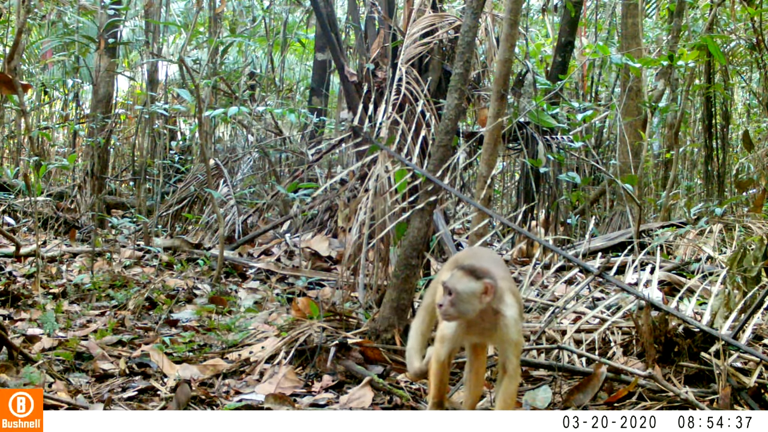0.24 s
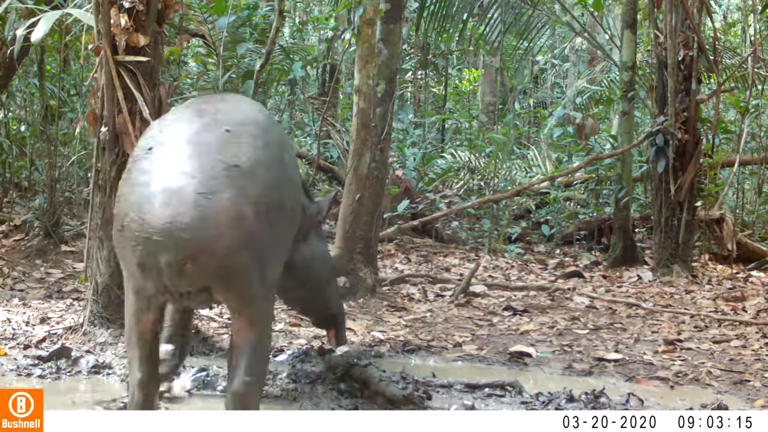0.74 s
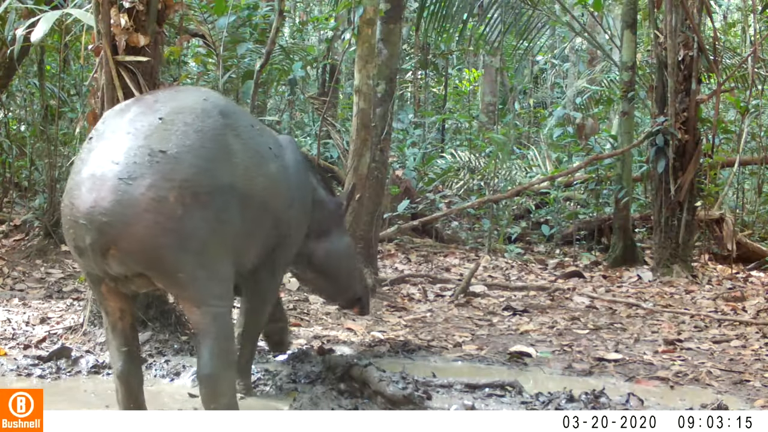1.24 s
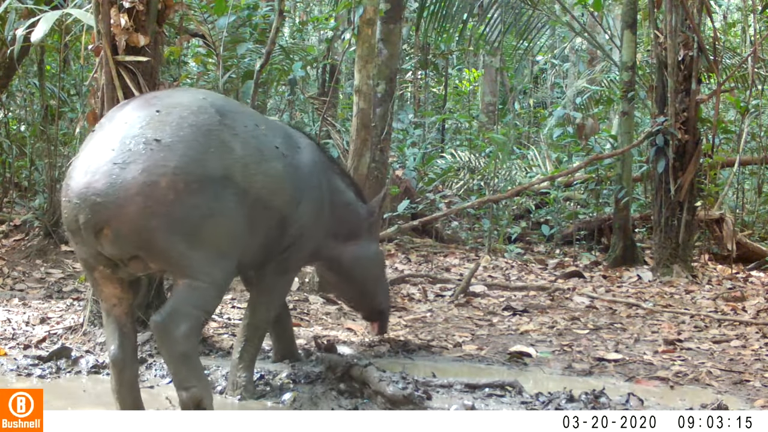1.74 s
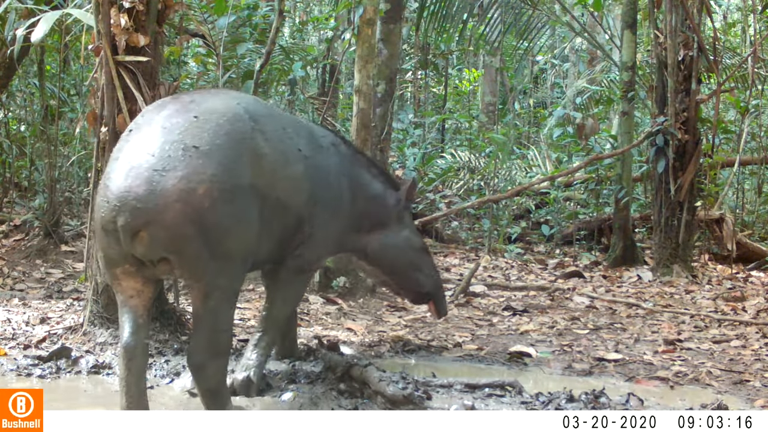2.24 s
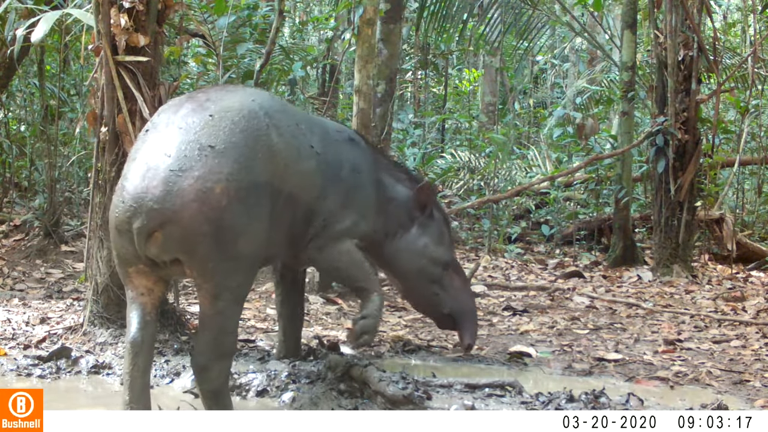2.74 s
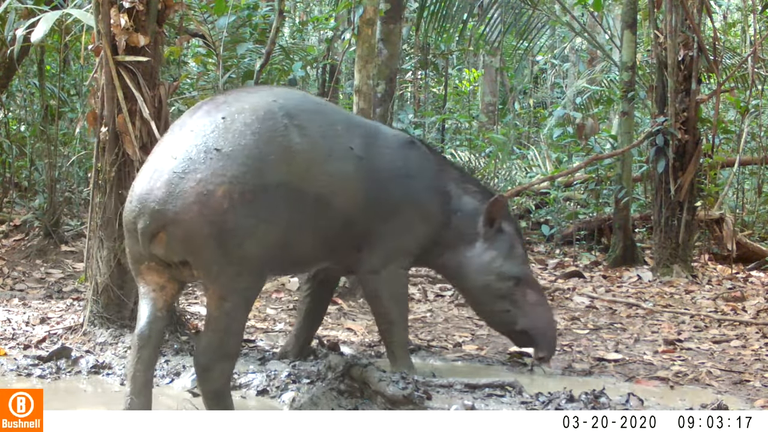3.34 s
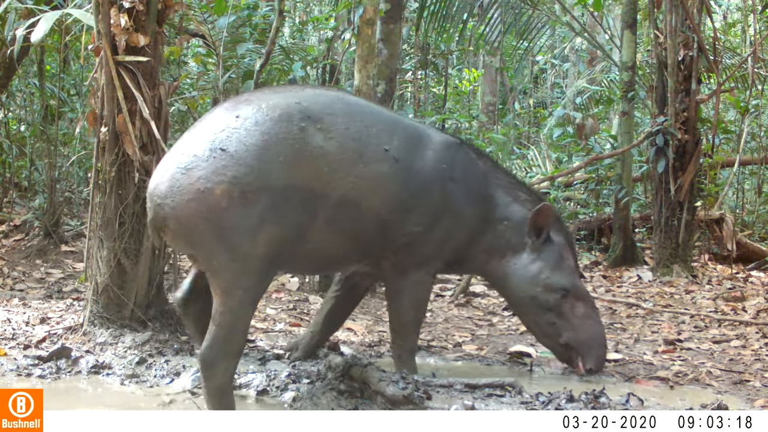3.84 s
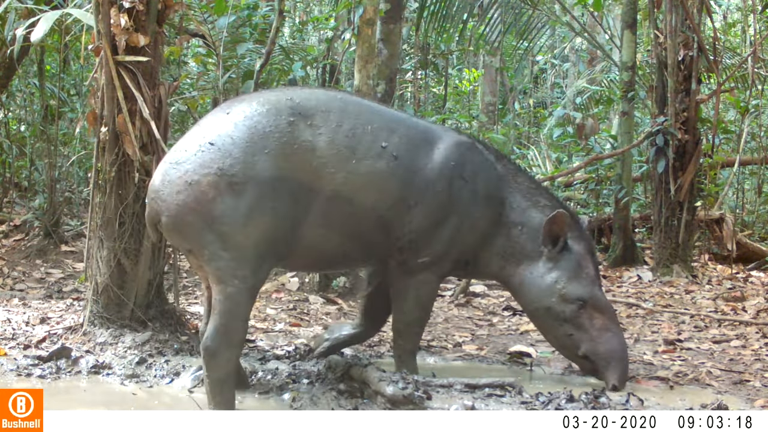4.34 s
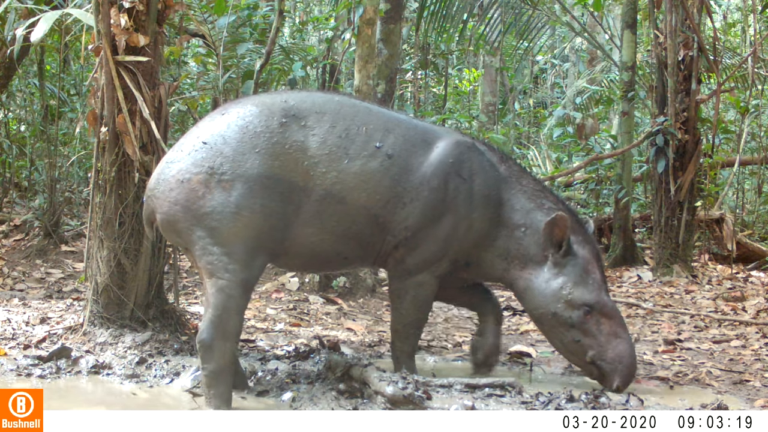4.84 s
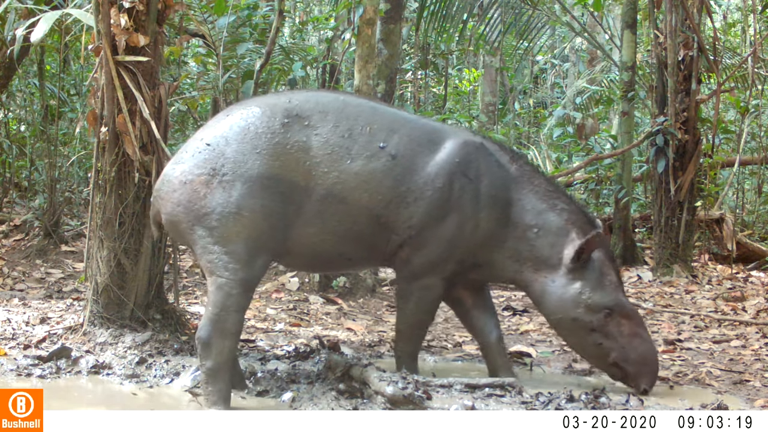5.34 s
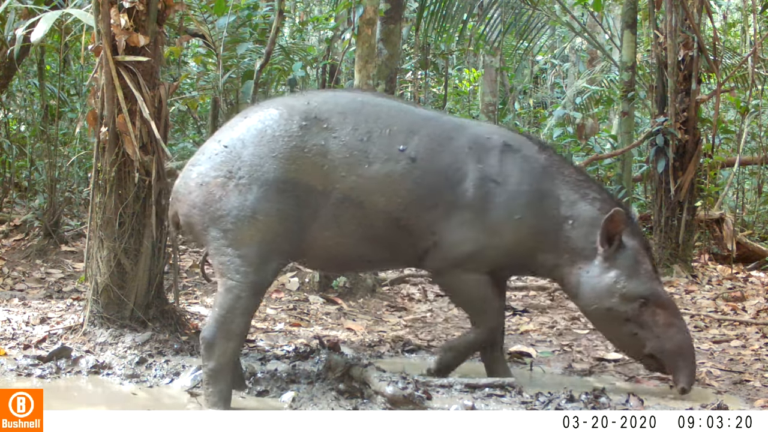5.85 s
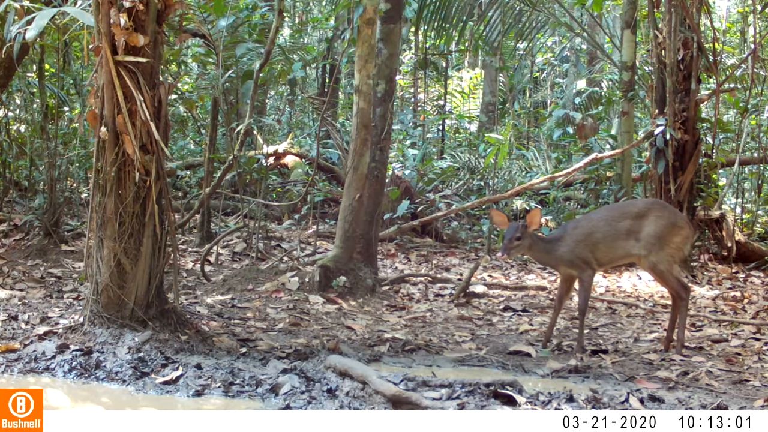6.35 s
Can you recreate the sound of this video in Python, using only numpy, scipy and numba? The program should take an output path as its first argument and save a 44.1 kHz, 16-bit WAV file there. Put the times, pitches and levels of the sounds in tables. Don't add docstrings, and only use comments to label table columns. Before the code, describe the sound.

Close, dry outdoor sound from a small fixed camera with a muffled microphone. Constant hiss stops for an instant and restarts. Hoofed feet then stir muddy water, with hollow bubble pops, falling drops, sticky mud snaps and fine crackling spray. The strongest burst comes about two seconds in; later steps are isolated and softer, with quiet gaps and buzzy electronic ticks between them. After a small click, hiss remains.

```python
import sys
import numpy as np
from scipy import signal
from scipy.fft import rfft, irfft
from scipy.io import wavfile
from scipy.ndimage import uniform_filter1d, minimum_filter1d
from numba import njit

SR = 44100
rng = np.random.default_rng(int(sys.argv[2]) if len(sys.argv) > 2 else 0)


def inscribe(sig):
    pcm = np.round(np.clip(np.atleast_2d(sig).T, -1, 1) * 32767)
    wavfile.write(sys.argv[1], SR, pcm.astype(np.int16))


def convert_level_to_amplitude(level_db):
    exponent = np.asarray(level_db, float) / 20
    return 10 ** exponent


N = 290852
STOP_S, RESTART_S, SPLICE_S = .7487, .7978, 6.2698
WAKE_S = .088


def unit(x):
    return x / np.sqrt(np.mean(x ** 2))


def colour(x, points):
    hz, db = np.transpose(points)
    f = np.maximum(np.arange(N // 2 + 1) * SR / N, 1)
    gain = convert_level_to_amplitude(np.interp(np.log(f), np.log(hz), db))
    return irfft(rfft(x) * gain, N)


@njit
def ring(s, size, hz, t60_s, rise_s, glide):
    out = np.zeros(N)
    for k in range(len(s)):
        i0 = int(s[k] * SR)
        steps = int(t60_s[k] * SR) + 1
        rise_step = np.exp(-1 / (rise_s[k] * SR))
        bend = glide[k] ** (1 / steps)
        unrisen, turn, phase = 1., 2 * np.pi * hz[k] / SR, 0.
        for i in range(min(steps, N - i0)):
            unrisen *= rise_step
            turn *= bend
            phase += turn
            decay = np.exp(-np.log(1000) * (i / steps) ** 2.6)
            out[i0 + i] += size[k] * decay * (1 - unrisen) ** 2 * np.sin(phase)
    return out


# (frequency [Hz], density [dB per Hz])
HISS_COLOUR = [(20, -25.5), (200, -9.5), (750, -2), (1500, -2), (2600, -5.5), (4000, -16.5), (6300, -34),
               (9000, -66)]


def hiss():
    first_db, second_db, wake_db = -53, -52, -4.5
    hold = SR // 12
    t = np.arange(N) / SR
    flicker = uniform_filter1d(np.repeat(rng.standard_normal(N // hold + 1), hold), hold)[:N]
    asleep = np.clip(1 - (t - RESTART_S) / WAKE_S, 0, 1)
    db = np.where(t < RESTART_S, first_db, second_db + wake_db * asleep)
    return unit(colour(rng.standard_normal(N), HISS_COLOUR)) * convert_level_to_amplitude(db + 0.92 * flicker - 1.28)


def converter_noise():
    first_db, second_db, wake_db = -85.5, -83, -7
    t = np.arange(N) / SR
    db = np.where(t < RESTART_S, first_db, second_db + wake_db * (t < RESTART_S + WAKE_S))
    return convert_level_to_amplitude(db + 3.5) * rng.standard_normal(N)


# (frequency [Hz], level [dB rms])
HUM_LINES = [
    (59.5, -88.5),
    (119, -90),
    (7768, -108),
    (7827, -107),
]
# (time [s], first tick level [dB], second tick level [dB])
TICK_LEVELS = [(0.8, -67, -67), (2.4, -56.5, -50), (3.0, -64, -56), (3.5, -47.5, -53), (4.2, -47.5, -67),
               (4.6, -48, -67), (5.3, -49, -62), (5.6, -43.5, -50), (5.9, -45, -50), (6.1, -60, -64),
               (6.27, -66, -62)]


def electronics():
    frame_hz, tick_s = 29.7525, (.0044, .0215)
    out = converter_noise()
    for hz, db in HUM_LINES:
        out += np.sqrt(2) * convert_level_to_amplitude(db) * np.sin(2 * np.pi * hz * np.arange(N) / SR)
    s, first_db, second_db = np.transpose(TICK_LEVELS)
    frame = np.arange(int(s[0] * frame_hz), int(s[-1] * frame_hz)) / frame_hz
    same = np.ones(len(frame))
    for delay_s, db in zip(tick_s, (first_db, second_db)):
        scatter, detune, jitter = rng.standard_normal((3, len(frame)))
        start = frame + delay_s + .0002 * jitter
        size = convert_level_to_amplitude(np.interp(frame, s, db) + 1.7 * scatter)
        out += ring(start, size, 1100 * (1 + 0.069 * detune), 0.0081 * same, .0003 * same, 1.23 * same)
    return out


# (time [s], level [dB], hold [s])
LEG_MOVES = [(.89, -53, 0.026), (0.964, -59, 0.44), (1.388, -54.5, 0.073), (1.7, -60.5, 0.092),
             (1.8, -55.5, 0.12), (1.987, -46, 0.052), (2.174, -54, 0.035), (2.382, -58.5, .12),
             (2.888, -60, 0.088), (3.022, -50, .03), (3.07, -56, 0.11), (3.22, -64, 0.64),
             (4.013, -53.5, .05), (4.078, -52.5, .01), (4.12, -68, .2), (5.124, -49, 0.0088),
             (5.187, -57, .02), (6.0, -57, .02), (6.127, -59, 0.17)]


def stir():
    attack_s, release_s, calm_db = 0.015, 0.059, -66
    t = np.arange(N) / SR
    power = convert_level_to_amplitude(2 * calm_db)
    for s, db, hold_s in LEG_MOVES:
        before_s = np.maximum(s - t, 0)
        after_s = np.maximum(t - s - hold_s, 0)
        fall_db = 10 * (before_s / attack_s + after_s / release_s)
        power = power + convert_level_to_amplitude(2 * (db - fall_db))
    return np.where((t > RESTART_S) & (t < SPLICE_S), 10 * np.log10(power), -90)


def spray(stir_db, count=9000):
    when, pitch, loud, cycles = rng.random((count, 4)).T
    hz = 900 * 6.0 ** pitch
    size = convert_level_to_amplitude(np.minimum(-2.2 * np.log(loud), 8.0))
    grains = ring(when * N / SR, size, hz, (5 + 12 * cycles) / hz, 0.41 / hz, 1.28 + 0 * hz)
    grains = colour(grains, [(300, -15), (1200, -5.0), (2500, 2.5), (4000, -7.5), (5500, -16.0), (8000, -35)])
    return unit(grains) * convert_level_to_amplitude(stir_db)


def beads(stir_db, count=260):
    when, pitch, loud = rng.random((count, 3)).T
    hz = 2400 * 2.1 ** pitch
    churn_db = .6 * (stir_db[(when * N).astype(int)] + 54.5)
    db = -48.5 + churn_db - 12 * pitch - 8 * loud
    return ring(when * N / SR, convert_level_to_amplitude(db), hz, 0.0031 + 1.5 / hz, .6 / hz, 1.03 + 0 * hz)


# (time [s], peak level [dB], pitch [Hz], life [ms])
POCKETS = [(0.8374, -42.5, 1530, 48), (0.8914, -40.5, 2840, 37), (0.9246, -46.5, 3020, 39),
           (0.9459, -43, 1090, 20), (1.8157, -13, 1562, 18.6), (1.8195, -21.5, 1640, 20),
           (1.8378, -38.5, 1360, 31), (1.867, -37.5, 1310, 29), (2.0031, -18.5, 1590, 5.8),
           (2.005, -19.5, 2750, 6.8), (2.005, -30.5, 4220, 5.4), (2.0044, -28, 1520, 16),
           (2.0356, -41, 3280, 28), (2.0414, -33, 1490, 32), (2.0533, -23, 1470, 14),
           (2.0563, -36, 1410, 30), (2.1305, -46, 1390, 62), (2.1492, -29.5, 1370, 19),
           (2.157, -37, 1470, 34), (2.254, -41.5, 1610, 43), (2.3969, -26, 1420, 4.9),
           (2.3978, -28, 1007, 16), (3.038, -40, 1530, 24), (3.0992, -36, 1250, 25),
           (3.1272, -41, 1610, 30), (4.082, -32.5, 2220, 22), (4.2838, -41, 1620, 35),
           (5.836, -45, 2360, 32), (6.002, -43, 2170, 25), (6.2231, -38.5, 1046, 25)]
# (time [s], peak level [dB], pitch [Hz])
MORE_POCKETS = [(0.9087, -46, 4180), (0.908, -38, 3060), (1.0844, -48, 3850), (1.113, -43, 3220),
                (1.2268, -42, 2770), (1.2826, -43, 3170), (1.851, -38.5, 2680), (1.86, -38.5, 3340),
                (1.8902, -39, 1790), (1.939, -42.5, 3120), (1.9832, -30, 1750), (1.997, -35, 2630),
                (1.998, -35, 1530), (2.0062, -25, 2620), (2.023, -39, 2240), (2.0335, -36, 2870),
                (2.1736, -29.5, 2710), (2.175, -36.5, 4100), (2.177, -34.5, 2070), (2.789, -33.5, 1420),
                (3.0183, -32.5, 1660), (3.029, -40, 2880), (3.0868, -30, 1580), (3.1173, -35, 1680),
                (3.154, -38, 1550), (4.071, -38.5, 2670), (5.129, -30.5, 1920), (5.1328, -36, 2060),
                (5.174, -35, 1900), (6.024, -39.5, 1930)]


def pops():
    small_life_ms = 11
    pockets = list(POCKETS) + [(s, db, hz, small_life_ms) for s, db, hz in MORE_POCKETS]
    s, db, hz, life_ms = np.transpose(pockets).astype(float)
    life_s = life_ms / 1000
    size = np.sign(rng.standard_normal(len(s))) * convert_level_to_amplitude(db + 1.5)
    body = ring(s - .0002, size, hz, 0.38 * life_s + 1.0 / hz, 0.69 / hz, 0.97 + 0 * s)
    snap = ring(s - .0002, size * convert_level_to_amplitude(-17.0), 1.53 * hz, 3.4 / hz, 0.065 / hz, 0.84 + 0 * s)
    tail = ring(s + 0.00148, size * convert_level_to_amplitude(-15.5), 1.02 * hz, 0.92 * life_s, 2.0 / hz, 1.03 + 0 * s)
    return body + snap + tail


# (time [s], peak level [dB], pitch [Hz])
FALLING_DROPS = [(0.839, -42, 2420), (0.8526, -39, 1250), (0.8898, -46, 3960), (1.0596, -41, 1420),
                 (1.0845, -44, 2670), (1.187, -45, 2800), (1.303, -49, 4070), (1.458, -46, 3160),
                 (1.712, -42, 3100), (1.7471, -43, 2770), (1.7601, -41, 2600), (1.8146, -38, 2760),
                 (1.8961, -48, 3970), (2.018, -39, 3220), (2.2944, -51, 3920), (2.3966, -32, 2030),
                 (2.7681, -50, 4050), (3.0078, -48, 3640), (3.0258, -40, 2980), (3.0481, -47, 2950),
                 (3.1004, -32, 1580), (3.138, -39, 1720), (3.139, -39, 1090), (3.7777, -44.5, 3470),
                 (4.0795, -37, 2400), (4.0908, -36, 1710), (5.121, -43, 3330), (5.1462, -43, 2950),
                 (5.1835, -48, 3850), (5.284, -39, 1890)]
# (time [s], peak level [dB], pitch [Hz])
WET_TICKS = [(0.8645, -59, 4480), (0.898, -48, 3860), (0.9139, -52, 4440), (0.9144, -49, 3660),
             (0.9248, -53, 4820), (0.9738, -44, 2650), (1.037, -50, 3340), (1.0486, -47, 3190),
             (1.0666, -55, 4090), (1.0917, -48, 3830), (1.1123, -54, 4690), (1.2073, -54, 4310),
             (1.328, -52, 3880), (1.4612, -51, 3920), (1.6162, -52, 4570), (1.7301, -48, 3270),
             (1.7521, -52, 4820), (1.7735, -47, 2840), (1.9533, -52, 4010), (2.0113, -52, 4310),
             (2.0255, -49, 4200), (2.0485, -47, 2760), (3.0117, -47, 4100), (3.049, -54, 4480),
             (3.1386, -49, 3750), (3.8939, -47, 3500), (4.1057, -51, 3360), (5.1282, -42, 3480),
             (5.1606, -56, 4480), (6.1805, -55, 4900)]


def drops():
    s, db, hz = np.transpose(list(FALLING_DROPS) + list(WET_TICKS)).astype(float)
    return ring(s - .0005, convert_level_to_amplitude(db + 0.5), hz, 0.0032 + 2.5 / hz, .5 / hz, 0.95 + 0 * s)


# (time [s], peak level [dB], pitch [Hz], length [ms], end over start pitch [ratio])
RISING_BUBBLES = [
    (0.902, -46, 598, 20, 1.17),
    (0.932, -49, 370, 8.1, 2.1),
    (1.851, -43.5, 910, 13, 1.08),
    (2.7902, -44.5, 1333, 31, 1.32),
    (3.140, -45, 1060, 14, 1.05),
    (1.58, -51.5, 540, 16, 1.03),
    (4.081, -47, 707, 12, 1.24),
    (4.036, -44.5, 1400, 11, 1.1),
    (5.849, -48.5, 1650, 11, 2.3),
]


def risers():
    out = np.zeros(N)
    for s, db, hz, ms, bend in RISING_BUBBLES:
        u = np.linspace(0, 1, int(ms * SR / 1000))
        i = int(s * SR)
        tone = np.sin(np.cumsum(2 * np.pi * hz * bend ** (u ** 1.9) / SR))
        out[i:i + len(u)] += convert_level_to_amplitude(db) * np.sin(np.pi * u) ** 0.36 * tone
    return out


# (time [s], peak level [dB], centre [Hz], fall by 60 dB [ms])
MUD_SLAPS = [(1.8152, -38.5, 3970, 12), (1.9832, -51, 3500, 15), (1.998, -54, 4000, 20),
             (2.0032, -29, 3040, 42), (2.1738, -52, 3980, 25), (2.3935, -33, 1850, 32),
             (6.0005, -40.5, 2450, 23), (4.0795, -48, 516, 69), (2.003, -42.5, 600, 28),
             (2.3954, -46, 600, 32), (3.008, -47, 3800, 25), (3.027, -47, 6200, 20), (3.048, -50, 4000, 33),
             (4.0795, -48, 2690, 80), (5.128, -57, 4600, 25), (0.932, -52, 290, 54)]


def splats():
    out = np.zeros(N)
    t = np.arange(4096) / SR
    front = (1 - np.exp(-t / 0.00032)) ** 2
    for s, db, hz, t60_ms in MUD_SLAPS:
        band = signal.butter(3, [hz * 0.54, hz * 1.14], "band", fs=SR, output="sos")
        burst = unit(signal.sosfilt(band, rng.standard_normal(len(t))))
        i = int(s * SR)
        out[i:i + len(t)] += convert_level_to_amplitude(db - 60000.0 * t / t60_ms) * front * burst
    return out


# (time [s], peak level [dB], pitch [Hz])
TEARING_FILMS = [(.9462, -38, 1400), (1.0945, -42, 4600), (1.186, -45, 4200), (2.254, -37, 1800),
                 (6.001, -43, 2300), (1.983, -32, 2680), (1.9904, -33, 2800), (1.998, -37, 2600),
                 (2.0024, -29, 2600), (2.0046, -26.5, 3600), (2.0098, -34, 2800), (2.1494, -39, 2600),
                 (2.174, -25, 2450), (2.396, -33, 2480), (2.398, -36, 2580), (1.6165, -50, 5000),
                 (3.188, -46, 3600), (3.025, -37, 2800), (3.1006, -41, 2000), (4.0811, -34, 2580),
                 (4.0832, -31.5, 2180), (5.1282, -40, 3380)]


def cracks():
    s, db, hz = np.transpose(TEARING_FILMS).astype(float)
    return ring(s, convert_level_to_amplitude(db + 2.5), hz, 3.3 / hz, 0.19 / hz, 0.7 + 0 * s)


def scene():
    camera = hiss() + electronics()
    stir_db = stir()
    water = beads(stir_db) + pops() + drops() + risers() + splats() + cracks()
    water = signal.sosfilt(signal.butter(5, 5400, fs=SR, output="sos"), water)
    return (camera + spray(stir_db) + water)[None]


def roll_off(x):
    return signal.sosfilt(signal.butter(12, 16410, fs=SR, output="sos"), x)


def record(dry):
    x = dry.copy()
    stop, restart, click = (int(s * SR) for s in (STOP_S, RESTART_S, SPLICE_S))
    fade = np.arange(400)
    x[:, stop:restart] = 0
    x[:, restart:restart + 400] += convert_level_to_amplitude(-53) * np.exp(-fade / 60.)
    x[:, click:click + 400] += convert_level_to_amplitude(-46) * np.exp(-fade / 20.)
    x = signal.sosfiltfilt(signal.ellip(10, .1, 60, 15720, fs=SR, output="sos"), x)
    top = signal.sosfiltfilt(signal.butter(12, 12900, "high", fs=SR, output="sos"), x)
    bright = signal.sosfiltfilt(signal.butter(4, 2400, "high", fs=SR, output="sos"), x)
    peak = -minimum_filter1d(-np.abs(bright), size=1000)
    loud = peak > .013
    loud[:, :restart] = np.repeat(rng.random(restart // 1024 + 1) < .3, 1024)[:restart]
    loud[:, restart:restart + int(WAKE_S * SR)] = True
    x = x - top * uniform_filter1d(1. * loud, size=200)
    x[:, N - 200:] = 0
    return roll_off(x)


dry = scene()
out = record(dry)
inscribe(out)
```